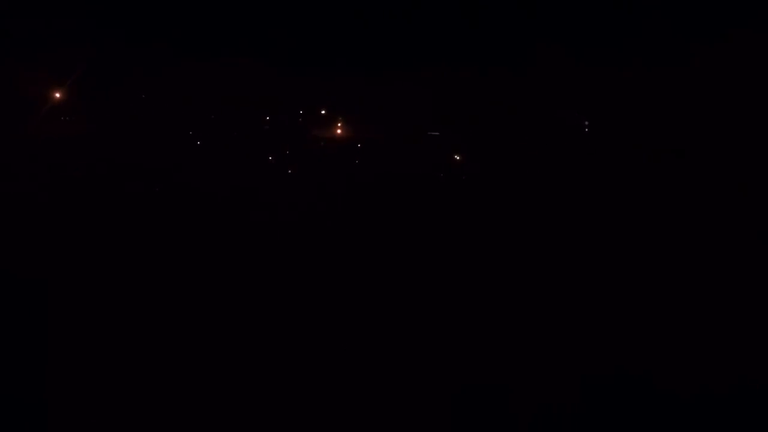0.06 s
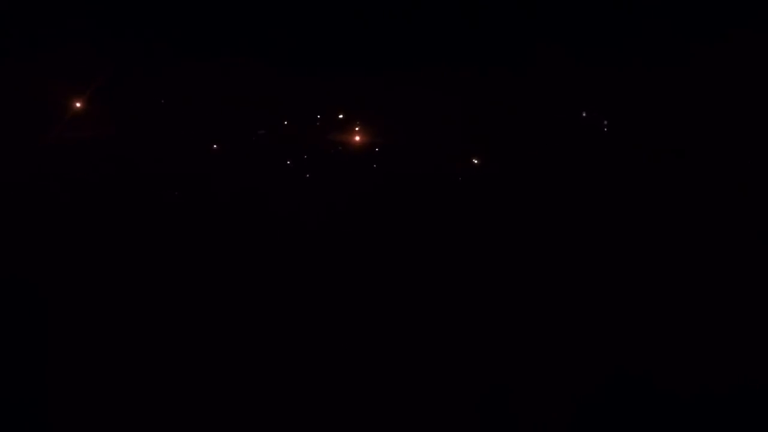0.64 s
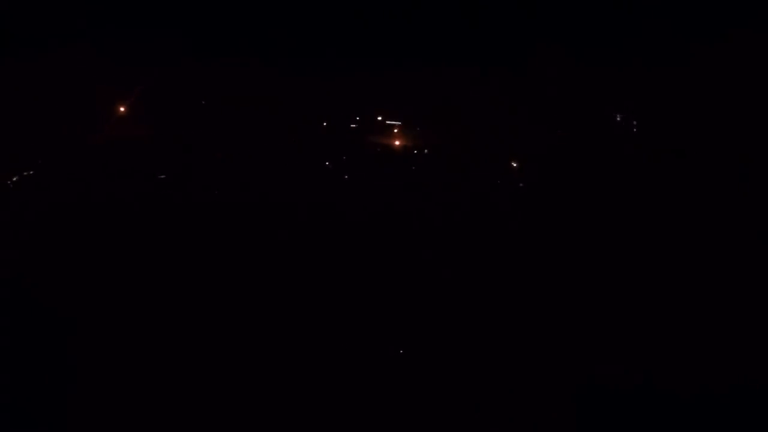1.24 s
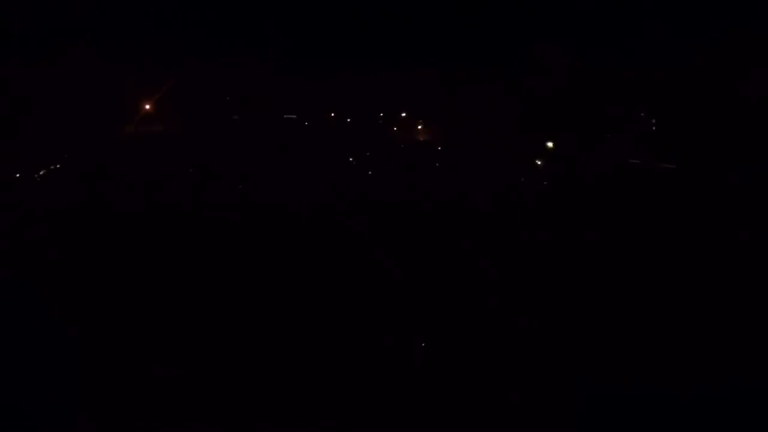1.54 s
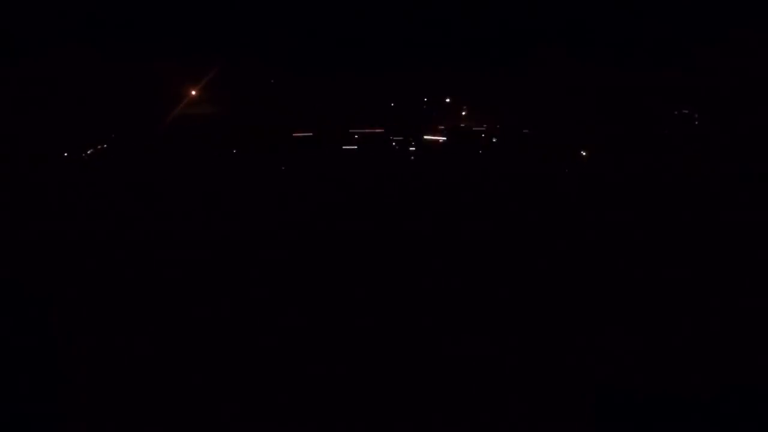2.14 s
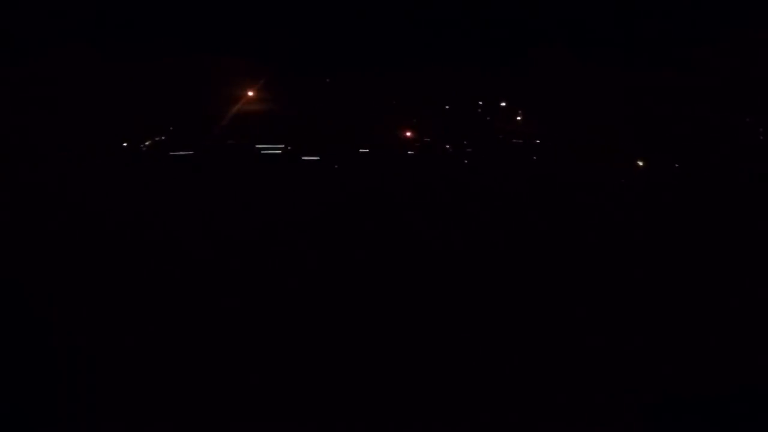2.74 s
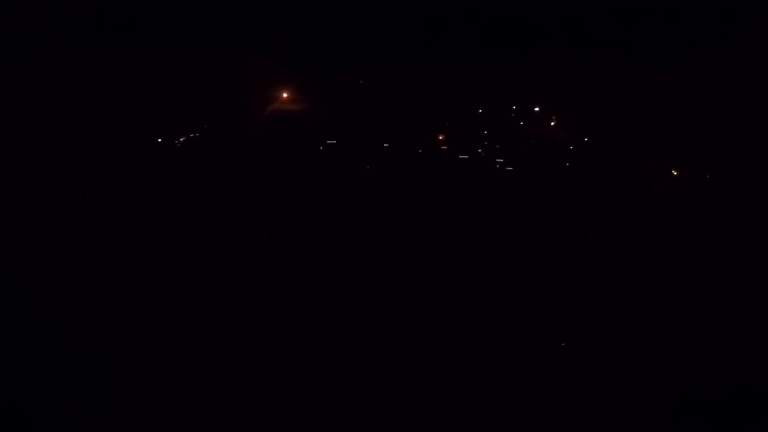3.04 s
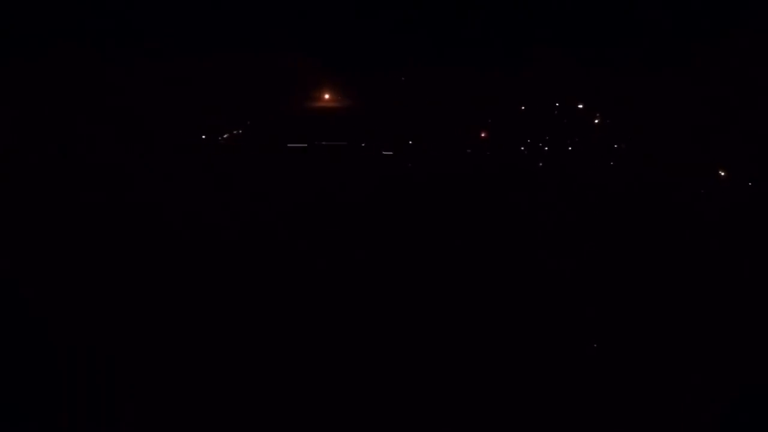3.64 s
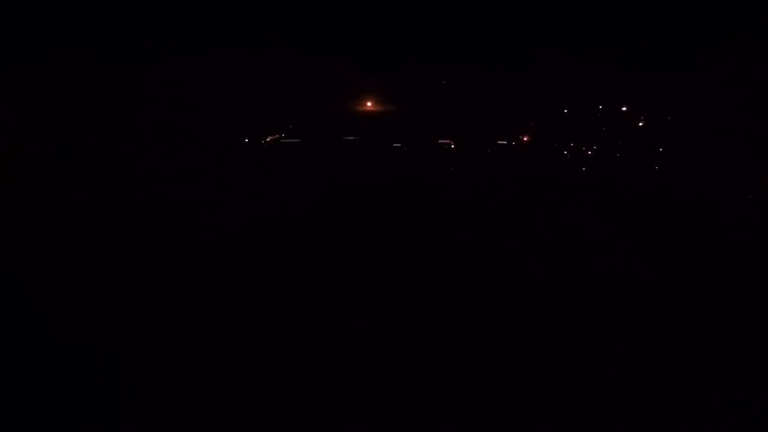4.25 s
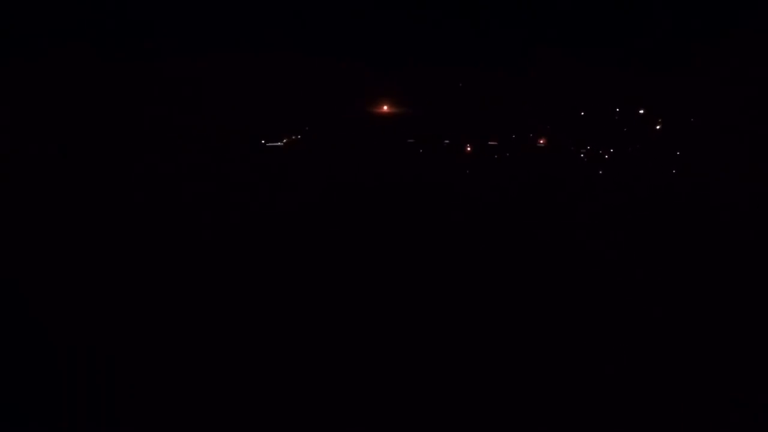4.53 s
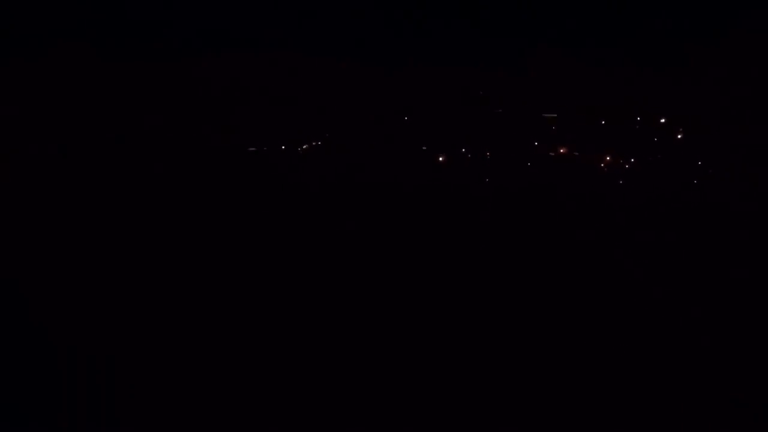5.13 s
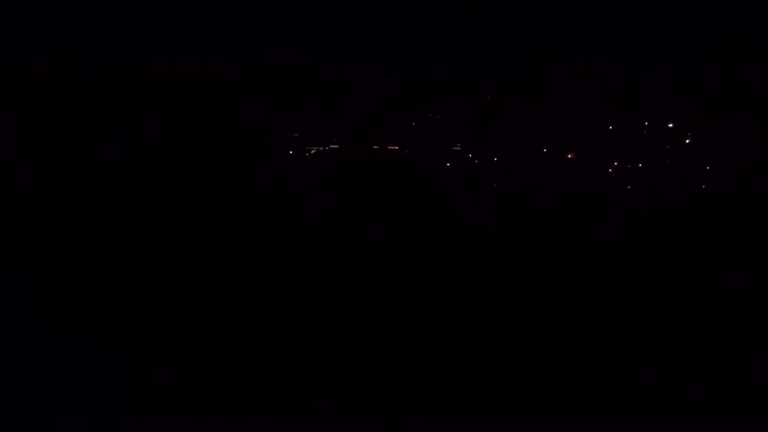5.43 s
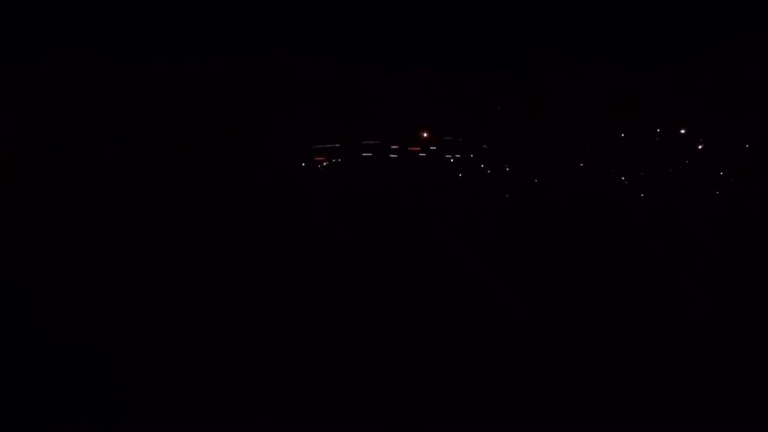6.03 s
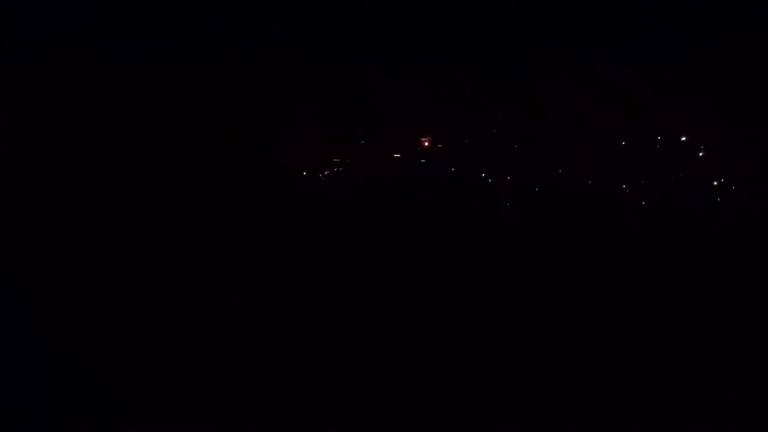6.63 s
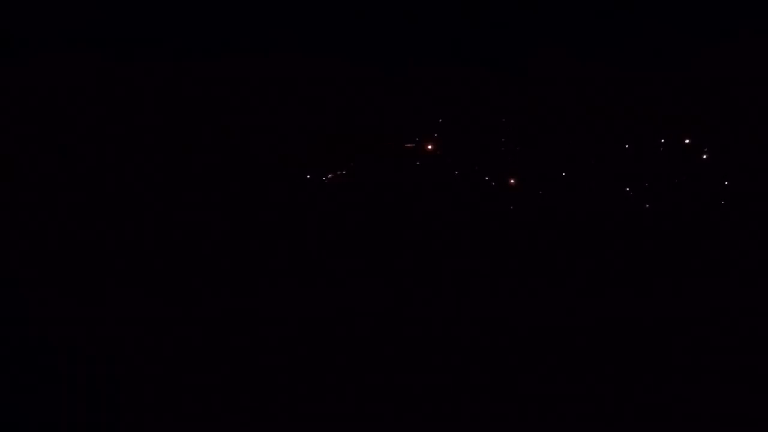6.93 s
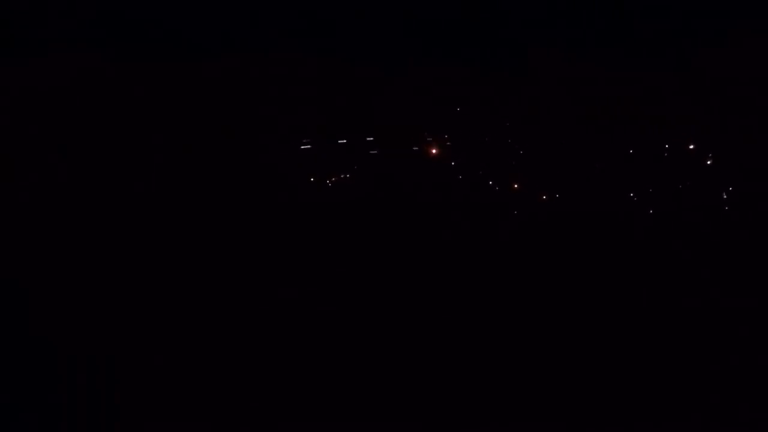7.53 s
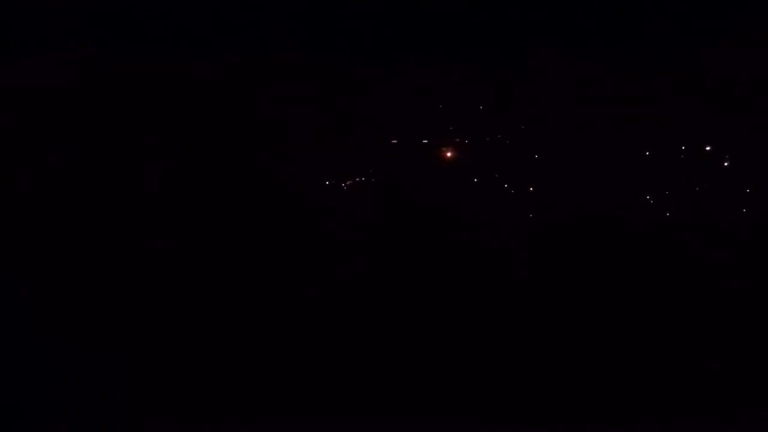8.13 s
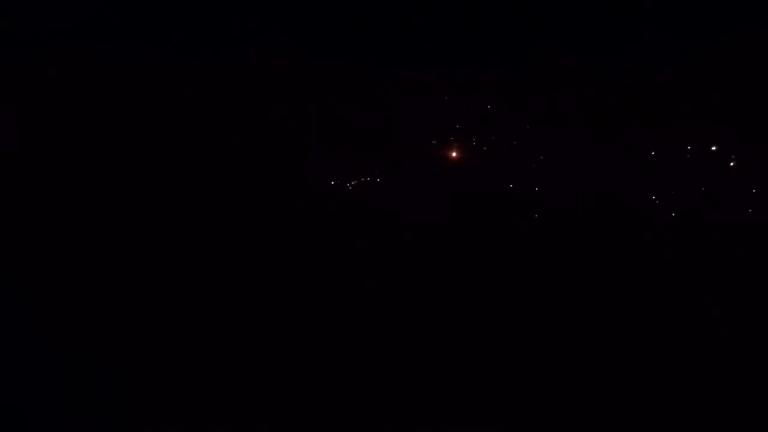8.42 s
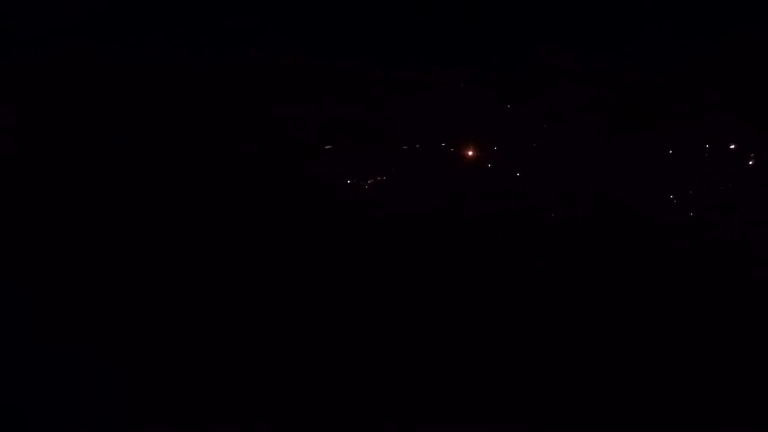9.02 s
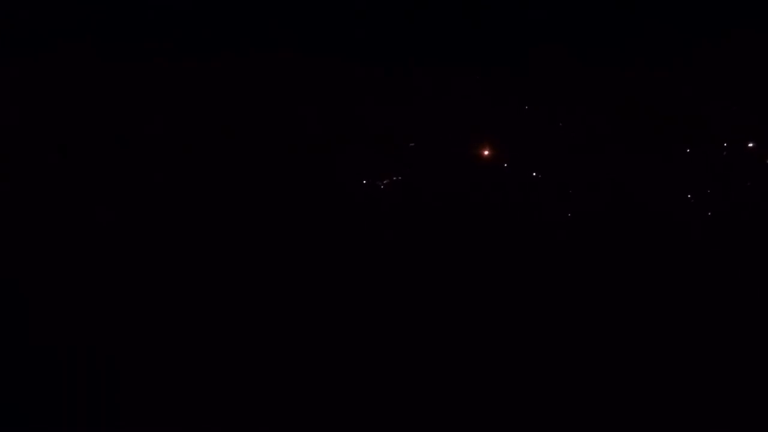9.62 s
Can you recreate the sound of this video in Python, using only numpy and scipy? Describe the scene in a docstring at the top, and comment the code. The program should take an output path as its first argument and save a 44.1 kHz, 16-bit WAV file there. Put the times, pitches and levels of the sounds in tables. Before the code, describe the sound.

A fireworks display heard from some distance, outdoors among houses at night. A few sharp cracks quickly grow into dense, rapid strings of bangs over dull far thuds and small crackling pops. The barrage eases midway, surges again, then thins to faint thuds and scattered pops. Each bang slaps off house fronts and rolls away briefly, and wind bumps the microphone a few times.

```python
"""Outdoors at night among houses, some way from a fireworks display.
Several batteries fire strings of cracks, about eleven a second, among dull far thuds. Every shot from
one place takes the same path, so it has the same tone, ground bounce and wall echo; then it rolls away.
Small pops crackle underneath and wind bumps the microphone. Its housing rings, and the loudest cracks
overload it."""
import sys
import numpy as np
from scipy import signal
from scipy.fft import rfft, irfft, next_fast_len
from scipy.io import wavfile

SR = 44100
rng = np.random.default_rng(int(sys.argv[2]) if len(sys.argv) > 2 else 0)


def wav_out(sig):
    """Save sig, one row per channel (or a flat mono array), as 16-bit PCM at SR to the path in sys.argv[1]."""
    wavfile.write(sys.argv[1], SR, np.round(np.clip(np.atleast_2d(sig).T, -1, 1) * 32767).astype(np.int16))


N = 430857
SHOT = 2048  # samples in one bang
TIME = np.arange(N) / SR  # seconds into the scene
AGE = np.arange(SHOT) / SR  # seconds into one bang

# The path from each firing place. Each row: strength of the shock front, length of the close reflections
# in ms, ground bounce delay in ms, relative level of later reflections in dB, wall echo delay in ms,
# its level in dB, its cut-off in Hz, level sent to the rolling tail in dB.
PATHS = {"near": (-0.06, 6, 2.5, -10, 23, -15.5, 12999.5, -3.5),
         "bright": (.45, 5, 0.2, -14, 24, -20, 8998.5, 0.5),
         "hollow": (0.54, 4, 1.82, -18.5, 24, -11, 2101, -1.5),
         "round": (0.54, 4, 1, -3.5, 23.5, -17, 5000, 2), "dry": (-0.1, 3, 1.5, -22, 25.5, -14, 6000, -1.5),
         "echoing": (0.06, 4.1, 2.2, -3, 23.5, -16, 6999, 6.5),
         "hard": (0.4, 3, 1.67, -20.5, 25.5, -13.5, 6000, -2.5),
         "knocking": (0.5, 1.5, 1.2, -11.5, 26, -15, 3997, 2.5),
         "tick": (-0.5, 4, 1.6, -2, 25.5, -13, 5998.5, 2),
         "far": (0.7, 4.5, 3.5, -13, 26.5, -8.5, 2499.5, -6)}
# Five snap tones that the firing places share. Each row: frequency in Hz, level in dB.
BRIGHT = [(700, -36.5), (1200, -37.5), (1600, -6.5), (2000, -4.5), (2400, 3.5), (2700, -1), (3000, 7.5),
          (3600, -1.5), (4400, 2.5), (5100, -11), (6500, -24), (10000, -68)]
HOLLOW = [(700, -32), (1300, 5.5), (1600, -1.5), (1900, -15), (2250, 3.5), (2550, -2), (2950, -20.5),
          (3500, 3.5), (4000, -3.5), (4500, -4), (5000, -27.5), (14000, -54.5)]
ROUND = [(700, -28), (1200, 9), (1600, 1), (1950, 2), (2400, 6), (2650, 8.5), (3100, 7.5), (3600, -4),
         (4300, -1), (5000, -9), (6500, -13.5), (10000, -64.5)]
RATTLING = [(700, -25.5), (1200, -1), (1600, 4.5), (1950, 5.5), (2400, 8), (2650, 3), (3100, 2.5),
            (3600, -3.5), (4300, 0.5), (5000, -18.5), (6500, -12), (10000, -64)]
KNOCKING = [(600, -13.5), (1000, -16.5), (1300, 1.5), (1650, -2.5), (2000, -18), (2350, 4.5), (2600, 1.5),
            (3050, -6), (3500, -5.5), (4300, -8.5), (5100, -24), (10000, -93.5)]


def cracks():
    """All the batteries with their wall echoes, and the part of their sound that rolls on."""
    heard, rolling = np.zeros(N), np.zeros(N)
    for place, (*_, echo_ms, echo_db, echo_hz, tail_db) in PATHS.items():
        shots = battery(place)
        heard += shots + wall_echo(shots, echo_ms / 1000, echo_db, echo_hz)
        rolling += undb(tail_db) * shots
    return heard, rolling


def battery(place, sameness=0.49, snap_db=2.3):
    """Cracks from one firing place: a ragged snap with a bright edge, over the low push of the blast."""
    # Each row: start in seconds, level in dB, firing place.
    shots = [(.001, -34.5, "far"), (.012, -34.5, "far"), (0.0899, -5.5, "near"), (0.175, -8.5, "near"),
             (.267, -10.5, "near"), (.49, -42.5, "far"), (0.594, -39.5, "far"), (0.6862, -38, "far"),
             (0.8818, -5.5, "near"), (0.9652, -9.5, "near"), (1.0456, -12.5, "near"),
             (1.135, -11.5, "near"), (1.178, -23, "bright"), (1.228, -30, "tick"),
             (1.2441, -16.5, "bright"), (1.2547, -20.5, "hollow"), (1.305, -26, "round"),
             (1.329, -20, "hollow"), (1.3445, -16.5, "bright"), (1.378, -28, "tick"),
             (1.4056, -18.5, "hollow"), (1.4448, -15.5, "bright"), (1.4739, -10, "near"),
             (1.531, -32, "tick"), (1.5433, -18.5, "bright"), (1.5577, -11, "near"), (1.64, -10.5, "near"),
             (1.7054, -19.5, "hollow"), (1.7265, -12.5, "near"), (1.7354, -21.5, "round"),
             (1.7819, -19.5, "hollow"), (1.8314, -16, "bright"), (1.8578, -19.5, "hollow"),
             (1.9205, -17.5, "bright"), (1.9334, -17, "hollow"), (2.01, -13.5, "bright"),
             (2.086, -16, "hollow"), (2.1051, -15, "bright"), (2.143, -10, "near"), (2.16, -21, "hollow"),
             (2.1903, -17.5, "bright"), (2.229, -11, "near"), (2.276, -17.5, "bright"),
             (2.3071, -12, "near"), (2.3636, -18.5, "bright"), (2.3885, -13, "near"),
             (2.445, -18.5, "bright"), (2.4586, -28, "hollow"), (2.4674, -12, "near"),
             (2.5271, -18.5, "bright"), (2.5461, -14, "near"), (2.6071, -17, "bright"),
             (2.682, -18, "hollow"), (2.6936, -19, "bright"), (2.7553, -18, "hollow"),
             (2.7726, -17, "bright"), (2.796, -28, "far"), (2.8292, -15.5, "hollow"),
             (2.851, -16, "bright"), (2.9022, -16, "hollow"), (2.9421, -26.5, "far"),
             (2.9768, -15, "hollow"), (3.0176, -30, "far"), (3.05, -14.5, "hollow"),
             (3.1245, -14, "hollow"), (3.175, -26.5, "far"), (3.1986, -12.5, "hollow"),
             (3.246, -24.5, "far"), (3.2724, -12, "hollow"), (3.32, -23, "far"), (3.345, -11.5, "hollow"),
             (3.3891, -10, "bright"), (3.418, -15, "hollow"), (3.4912, -14, "hollow"),
             (3.5632, -12.5, "hollow"), (3.6361, -13.5, "hollow"), (3.7107, -11, "hollow"),
             (3.784, -11.5, "hollow"), (3.847, -22.5, "echoing"), (3.8556, -11.5, "hollow"),
             (3.9283, -11.5, "hollow"), (3.9792, -26, "echoing"), (4.001, -11.5, "hollow"),
             (4.075, -11.5, "hollow"), (4.1213, -24, "echoing"), (4.2486, -23, "echoing"),
             (4.3074, -31.5, "round"), (4.3688, -22.5, "echoing"), (4.4177, -29.5, "round"),
             (4.4824, -35, "echoing"), (4.645, -44, "far"), (4.71, -45, "far"), (4.7912, -24.5, "round"),
             (4.9013, -23, "round"), (4.996, -31, "round"), (5.0103, -32.5, "tick"),
             (5.074, -21.5, "round"), (5.1768, -14, "dry"), (5.215, -24, "round"), (5.2555, -15.5, "dry"),
             (5.2807, -26.5, "tick"), (5.3246, -23, "round"), (5.4309, -21, "round"),
             (5.955, -13, "echoing"), (6.0816, -12.5, "echoing"), (6.1978, -12.5, "echoing"),
             (6.3188, -13, "echoing"), (6.4355, -13.5, "echoing"), (6.5579, -11.5, "echoing"),
             (6.654, -16, "hard"), (6.6886, -13, "echoing"), (6.7486, -16, "hard"), (6.801, -14, "echoing"),
             (6.8222, -23.5, "knocking"), (6.89, -23, "knocking"), (6.9131, -12.5, "echoing"),
             (6.9511, -21.5, "knocking"), (7.0173, -22, "knocking"), (7.085, -24, "knocking"),
             (7.1467, -23.5, "knocking"), (7.2129, -25, "knocking"), (7.2741, -25, "knocking"),
             (7.2889, -28.5, "knocking"), (7.3372, -23, "knocking"), (7.3491, -16, "hard"),
             (7.4, -26, "knocking"), (7.4428, -16.5, "hard"), (7.464, -25.5, "knocking"),
             (7.5094, -23, "knocking"), (7.5272, -24, "knocking"), (7.5378, -15, "hard"),
             (7.5912, -25, "knocking"), (7.6313, -16, "hard"), (7.6577, -25, "knocking"),
             (7.698, -30.5, "knocking"), (7.7243, -14.5, "hard"), (7.791, -24, "knocking"),
             (7.8543, -26, "round"), (8.0636, -35.5, "tick"), (8.361, -39, "tick"), (8.3875, -39, "far"),
             (8.433, -40, "tick"), (8.5494, -35.5, "tick"), (8.598, -23.5, "hard"),
             (9.075, -37.5, "echoing"), (9.1438, -31, "knocking"), (9.169, -38.5, "knocking"),
             (9.6391, -38.5, "echoing"), (9.6467, -39, "tick")]
    # The high, middle and low parts of every crack. Each row: frequency in Hz, level in dB.
    treble_tone = [(3500, -22), (5000, -7), (5450, 3.5), (5900, 0), (6500, 5.5), (7200, -3), (8600, -9),
                   (10300, -8), (15000, -15.5)]
    body_tone = [(180, -21), (330, -5.5), (480, -2), (650, -4), (950, -0.5), (1350, -1), (2000, -20),
                 (5000, -67)]
    boom_tone = [(25, -43.5), (50, -2), (90, 2.5), (140, 2.5), (220, 3), (310, 2), (450, -12),
                 (1000, -38.5), (4000, -70)]
    # How each place sounds. Each row: snap tone, levels of treble, body and boom in dB,
    # then the treble's top edge, the body's bottom edge and the boom's top edge in Hz.
    tones = {"near": (BRIGHT, -8, -9.5, -5.5, 15000, 370, 610),
             "bright": (BRIGHT, -8, -4, -5, 14500, 250, 480),
             "hollow": (HOLLOW, -14.5, -3.5, -4.5, 14300, 180, 660),
             "round": (RATTLING, -24, -2.5, -10, 11000, 350, 220),
             "dry": (RATTLING, -20, -0.5, -11, 7200, 450, 210),
             "echoing": (ROUND, -11, -4, -0.24, 7500, 254, 930),
             "hard": (KNOCKING, -22.5, 0, -2.5, 7800, 465, 160),
             "knocking": (KNOCKING, -34, 2.7, 1, 8000, 540, 128),
             "tick": (ROUND, -20, -16, -16, 7400, 320, 240),
             "far": (KNOCKING, -28, 2.5, -8, 12000, 310, 560)}
    snap_tone, treble_db, body_db, boom_db, treble_hz, body_hz, boom_hz = tones[place]
    front, close_ms, bounce_ms, scatter_db = PATHS[place][:4]
    push = through(ground_bounce(bounce_ms / 1000, gain=0.65), response(boom_tone))
    boom = unit_start(lowpass(lowpass(push, boom_hz), boom_hz), count=353)
    body = signal.sosfilt(signal.butter(3, body_hz, "high", fs=SR, output="sos"), response(body_tone))
    treble = lowpass(response(treble_tone), treble_hz)
    bands = ((response(snap_tone), snap_db), (treble, treble_db), (body, body_db))
    usual = cluster(close_ms / 1000, front, evening=0.47)  # reflections all shots from here share
    out = np.zeros(N)
    for start, db in [(start, db) for start, db, fired_at in shots if fired_at == place]:
        close = sameness * usual + (1 - sameness) * cluster(close_ms / 1000, front)
        # later reflections trail the shock for some tens of milliseconds
        scatter = grains(SHOT, spread_db=8) * (1 - np.exp(-(AGE / 0.0032) ** 2)) * np.exp(-AGE / 0.015)
        shock = close / np.linalg.norm(close) + undb(scatter_db - 21.5) * scatter
        crack = sum(undb(band_db) * unit_start(through(shock, ir), count=353) for ir, band_db in bands)
        add(out, start, undb(db) * (crack + undb(boom_db) * boom))
    return out


def thuds(lead_s=0.00283, ragged_db=-4, scatter_db=-16):
    """Far bangs: the air has taken the treble, leaving a ragged knock and one slow pressure swing."""
    SOFT, FIRM, SHARP = -13, -8, -2.4  # how much knock the air leaves, in dB against the swing
    # Each row: time in seconds, relative level in dB, amount of knock.
    bangs = [(1.188, -21, SOFT), (1.311, -23, SOFT), (1.573, -22.5, FIRM), (1.705, -22, SOFT),
             (1.963, -21, FIRM), (2.094, -18.5, SOFT), (2.361, -20.5, SOFT), (2.488, -23, FIRM),
             (3.451, -28, SHARP), (4.444, -29.5, SHARP), (4.56, -35, SHARP), (4.8, -23, FIRM),
             (4.903, -21, FIRM), (4.998, -19.5, SOFT), (5.096, -20, FIRM), (5.195, -19.5, SOFT),
             (5.3, -20.5, FIRM), (5.403, -20, FIRM), (5.464, -23.5, FIRM), (5.505, -19, SOFT),
             (5.542, -25, SOFT), (5.631, -25, SOFT), (5.726, -26.5, SOFT), (5.815, -26.5, SOFT),
             (5.907, -26, FIRM), (6.015, -24, FIRM), (6.177, -22, FIRM), (6.231, -24, FIRM),
             (6.283, -21.5, FIRM), (6.387, -21.5, SOFT), (6.496, -22, SOFT), (6.6, -23.5, SOFT),
             (6.633, -24, SHARP), (6.703, -19, SOFT), (6.798, -19, FIRM), (6.846, -25.5, FIRM),
             (6.912, -20, SOFT), (7.028, -24, SOFT), (7.118, -27.5, FIRM), (7.205, -25.5, FIRM),
             (7.299, -25, FIRM), (7.4, -29, SOFT), (7.561, -28, SHARP), (7.818, -26.5, FIRM),
             (7.856, -26, SHARP), (7.906, -27, FIRM), (7.999, -27, SOFT), (8.053, -29, SHARP),
             (8.091, -27, SOFT), (8.182, -25, SOFT), (8.273, -26, SOFT), (8.352, -29.5, FIRM),
             (8.426, -31.5, SHARP), (8.541, -29.5, SHARP), (8.569, -27, SOFT), (8.651, -27.5, SOFT),
             (8.74, -27.5, SOFT), (8.834, -28, SOFT), (8.928, -26, SOFT), (9.077, -30.5, SHARP),
             (9.639, -31, SHARP)]
    # Tones of the swing and the knock. Each row: frequency in Hz, level in dB.
    swing_tone = [(25, -38.5), (50, -9.5), (90, -4.5), (130, -3), (180, 0.5), (260, -9), (400, -14.5),
                  (700, -23.5), (3000, -82)]
    knock_tone = [(150, -13), (280, -2.5), (440, 3), (600, 0.5), (900, 0.5), (1300, -9), (2000, -10.5),
                  (5000, -58)]
    swing, knock = response(swing_tone), unit_start(response(knock_tone), count=529)
    out = np.zeros(N)
    for when, db, knock_db in bangs:
        blast = ground_bounce(delay_s=0.0022 * np.exp(0.093 * rng.standard_normal()), gain=0.75)
        ragged = knock + undb(ragged_db) * through(knock, cluster(length_s=0.013, front=0))
        bang = unit_start(through(blast, swing), count=529) + undb(knock_db) * ragged
        bang = bang + undb(scatter_db) * through(bang, cluster(length_s=0.023, front=0))
        add(out, when - lead_s, undb(db + 4.0) * delay_lows(bang, lag_s=0.00516, corner_hz=322))
    return out


def cluster(length_s, front, evening=0.31):
    """A shock front and the close reflections that crowd in just behind it, scaled to energy 1."""
    crowd = grains(SHOT, spread_db=6.5) * np.exp(-(AGE / length_s) ** 2)
    crowd /= np.linalg.norm(crowd)
    crowd[0] += front
    # a blast holds all frequencies, so partly even out the gaps that the reflections leave
    spectrum = rfft(crowd, 2 * SHOT)
    crowd = irfft(spectrum / (abs(spectrum) + 1e-9) ** evening)[:SHOT]
    return crowd / np.linalg.norm(crowd)


def ground_bounce(delay_s, gain):
    """A blast and its reflection off the ground."""
    pair = np.maximum(1 - abs(AGE - delay_s) * SR, 0) * gain
    pair[0] = 1
    return pair


def delay_lows(x, lag_s, corner_hz):
    """Travel along the ground delays the low notes, so a bang falls in pitch."""
    hz = np.fft.rfftfreq(2 * SHOT, 1 / SR)
    phase = 2 * np.pi * lag_s * corner_hz * np.log1p(hz / corner_hz)
    return irfft(rfft(x, 2 * SHOT) * np.exp(-1j * phase))[:SHOT]


def wall_echo(x, delay_s, db, cutoff_hz):
    """One dulled, slightly ragged echo off the nearest house front."""
    echo = np.zeros(2 * SHOT)
    add(echo, delay_s, undb(db) * cluster(length_s=0.0018, front=0.21, evening=0.52))
    return through(x, lowpass(echo, cutoff_hz))


def rolling_echoes(x):
    """Slaps off house fronts farther away, then a grainy tail whose highest treble dies first."""
    # Each row: delay in seconds, level in dB.
    slaps = [(.041, -25), (0.0506, -26.5)]
    # Each row: frequency in Hz, level in dB, seconds to fade by 60 dB.
    tail = [(98, -13.5, 0.55), (350, -13.5, 0.71), (1000, -13, 0.6), (2500, -16.5, 1.0), (5000, -15, 0.53),
            (10900, -13, 0.21)]
    t = np.arange(SR) / SR
    echoes = np.zeros(SR)
    for delay, db in slaps:
        add(echoes, delay, undb(db) * cluster(length_s=0.0023, front=0.12, evening=1.0))
    # early echoes come one by one, late ones merge into a wash
    sparse = np.exp(-t / 0.15)
    separate = sparse * grains(SR, spread_db=2.5)
    wash = np.sqrt(1 - sparse ** 2) * rng.standard_normal(SR)
    spectrum = rfft(separate + wash)
    hz = np.maximum(np.fft.rfftfreq(SR, 1 / SR), 1)
    centres = np.log([row[0] for row in tail])
    for share, (_, db, fade_s) in zip(np.eye(len(tail)), tail):
        band = irfft(spectrum * np.interp(np.log(hz), centres, share))
        fade = np.exp(-np.log(1000) * t / fade_s) * (1 - np.exp(-t / 0.016))
        echoes += undb(db) * band * fade / np.linalg.norm(fade)
    return through(x, echoes)


def crackle(pops_per_s=90, spread_db=4.5, wash_db=-4, pops_db=-1, rumble_db=-2, thinning=0.94):
    """Many small pops at random moments, their blurred echoes and a low rumble."""
    # Each row: time in seconds, relative levels of the pops and of the rumble in dB.
    levels = [(0.55, -47.5, -82), (0.88, -53, -60), (1.06, -44, -41), (1.47, -33, -40), (2.14, -25, -30),
              (3.97, -29.5, -42), (4.66, -44.5, -53), (5.25, -34, -41), (5.79, -38.5, -49),
              (5.99, -33, -37), (6.12, -27.5, -33), (6.74, -22.5, -30), (7.15, -38.5, -37.5),
              (7.64, -34, -37), (8.02, -39.5, -47), (9.0, -42, -46), (9.36, -48.5, -52.5),
              (9.77, -58, -53.5)]
    # Each row of both tones: frequency in Hz, level in dB.
    pop_tone = [(200, -5), (500, -7), (950, -3.5), (1300, -4), (1600, -4), (2000, -3.5), (2500, 0.5),
                (3200, -1.5), (4400, -9), (5200, -19.5), (6500, -20), (8500, -34.5), (15000, -36)]
    rumble_tone = [(30, 5.5), (90, -14), (180, -2.5), (300, -1), (500, -9), (1000, -33.5), (4000, -74.5)]
    times, *columns = np.transpose(levels)
    high_db, low_db = (np.interp(TIME, times, column) for column in columns)
    pops = np.zeros(N)
    shapes = [cluster(length_s=.002, front=.6) for _ in range(64)]
    gaps, sizes = rng.standard_normal((2048, 2)).T
    starts = np.cumsum(gaps ** 2) / pops_per_s
    for k, (start, size) in enumerate(zip(starts, sizes)):
        add(pops, start, undb(spread_db * min(size, 1.5)) * shapes[k % len(shapes)])
    share = undb(thinning * np.minimum(high_db + 31.5, 0))  # in lulls mostly the blur is left
    mix = (share * unit(pops) + undb(wash_db) * rng.standard_normal(N)) / np.hypot(share, undb(wash_db))
    high = unit(through(mix, response(pop_tone)))
    low = unit(through(rng.standard_normal(N), response(rumble_tone)))
    return undb(high_db + pops_db) * high + undb(low_db + rumble_db) * low


def fizzes():
    """Short, faint, grainy hisses high in the treble."""
    # Each row: time of the peak in seconds, level in dB, half-width in seconds.
    moments = [(5.8, -56, 0.012), (7.55, -51, 0.031), (7.84, -45, 0.021), (8.88, -62, 0.078)]
    hiss = unit(bandpass(grains(N, spread_db=7), 7000, 15000))
    return hiss * swells(moments)


def air(night_db=-53, wind_hz=44, breeze_db=-49, whine_db=-81, whine_hz=12850):
    """Still night air, with a few low bumps of wind on the microphone; apart from the air, a very faint, thin
    whine holds near 12.9 kHz throughout."""
    # Each row: time of the peak in seconds, level in dB, half-width in seconds.
    gusts = [(0.774, -32, 0.026), (5.62, -31, 0.04), (7.23, -21, 0.032), (7.892, -25, 0.045)]
    # Each row: frequency in Hz, level in dB.
    night_tone = [(20, -9), (40, -18.5), (100, -8), (300, -29.5), (1000, -29.5), (2500, -21), (5000, -40.5),
                  (8000, -49.5), (15000, -52.5)]
    wind = unit(bandpass(rng.standard_normal(N), 20, wind_hz))
    # the same wind at an even strength, so the gusts alone set the size of each bump
    eddies = unit(np.cos(np.angle(signal.hilbert(wind, next_fast_len(N))[:N])))
    bumps = lowpass(eddies, 82) * swells(gusts)
    night = unit(through(rng.standard_normal(N), response(night_tone)))
    whine = unit(signal.lfilter(*signal.iirpeak(whine_hz, whine_hz / 270, fs=SR), rng.standard_normal(N)))
    return bumps + undb(breeze_db) * wind + undb(night_db) * night + undb(whine_db) * whine


def swells(rows):
    """A level that rises and falls in a bell shape for each row."""
    return sum(undb(db) * np.exp(-((TIME - peak_s) / width_s) ** 2) for peak_s, db, width_s in rows)


def grains(count, spread_db):
    """Tiny clicks of very uneven size, one on every sample."""
    return unit(rng.standard_normal(count) * undb(spread_db * np.minimum(rng.standard_normal(count), 2.5)))


def response(tone, size=8192):
    """A click with the given tone: the impulse response (ir) of a filter."""
    hz, db = np.transpose(tone)
    grid = np.maximum(np.fft.rfftfreq(size, 1 / SR), 1)
    gains = undb(np.interp(np.log(grid), np.log(hz), db))
    # folding the cepstrum packs the energy at the start of the click
    cepstrum = irfft(np.log(gains))
    cepstrum[1:size // 2] *= 2
    cepstrum[size // 2 + 1:] = 0
    return irfft(np.exp(rfft(cepstrum)))[:SHOT]


def through(x, ir):
    """Give x the tone and echoes of an impulse response."""
    return signal.fftconvolve(x, ir)[:len(x)]


def lowpass(x, hz):
    """Soften everything above hz."""
    return signal.sosfilt(signal.butter(2, hz, fs=SR, output="sos"), x)


def bandpass(x, low_hz, high_hz):
    """Soften everything outside the two frequencies."""
    return signal.sosfilt(signal.butter(2, [low_hz, high_hz], "band", fs=SR, output="sos"), x)


def add(out, start_s, x):
    """Mix x into out at the given time."""
    i = min(max(int(round(start_s * SR)), 0), len(out))
    out[i:i + len(x)] += x[:len(out) - i]


def undb(db):
    """Turn decibels into a multiplier."""
    return 10 ** (np.asarray(db) / 20)


def unit(x):
    """Scale to an average (rms) level of 1."""
    return x / np.sqrt(np.mean(x ** 2))


def unit_start(x, count):
    """Scale so that the first count samples have an average (rms) level of 1."""
    return x / np.sqrt(np.mean(x[:count] ** 2))


def scene():
    """All the blasts with their echoes, over crackle, fizzes and night air."""
    sharp, rolling = cracks()
    dull = thuds()
    blasts = sharp + dull + wall_echo(dull, delay_s=.027, db=-13.5, cutoff_hz=2500)
    return (blasts + rolling_echoes(rolling + dull) + crackle() + fizzes() + air())[None]


def record(dry):
    """The microphone housing rings, the loudest peaks flatten, and the highest treble is cut."""
    # Each row: ringing frequency in Hz, its width in Hz, level against the direct sound in dB.
    housing = [(1639, 103, 2.5), (2414, 118, 2), (3550, 110, -15.5), (6250, 53, -18)]
    rings = sum(undb(db) * signal.lfilter(*signal.iirpeak(hz, hz / width, fs=SR), dry)
                for hz, width, db in housing)
    clipped = np.clip(undb(-3) * (dry + rings), -.85, .85)
    return signal.sosfilt(signal.ellip(12, .2, 90, 15200, fs=SR, output="sos"), clipped)


dry = scene()
out = record(dry)
wav_out(out)
```